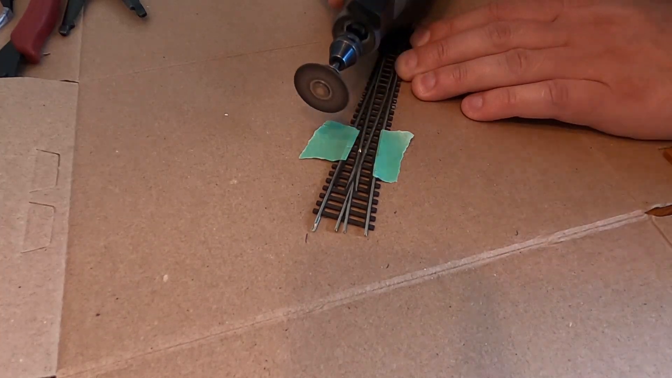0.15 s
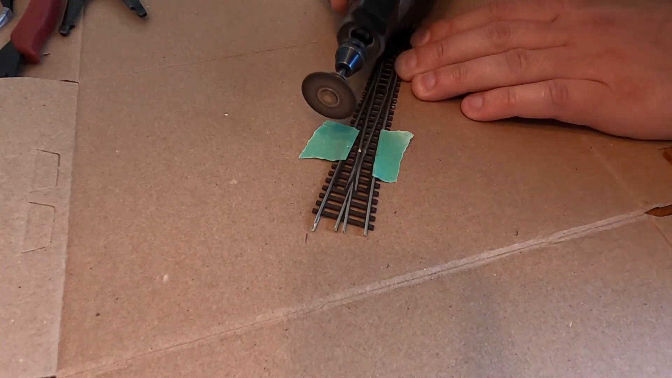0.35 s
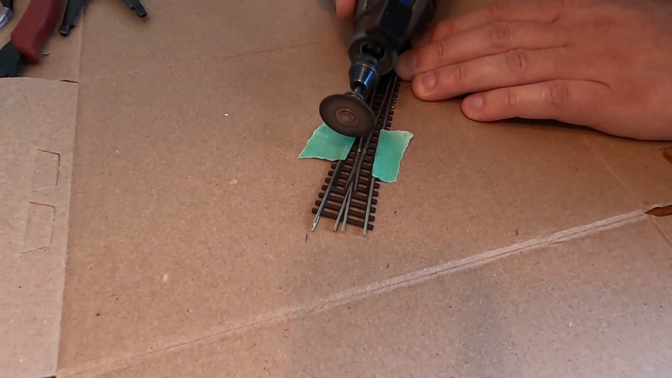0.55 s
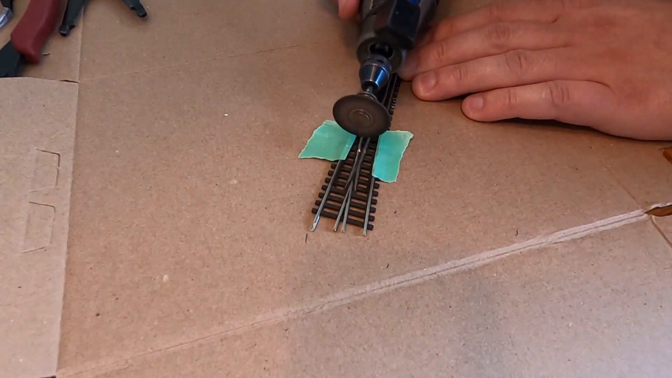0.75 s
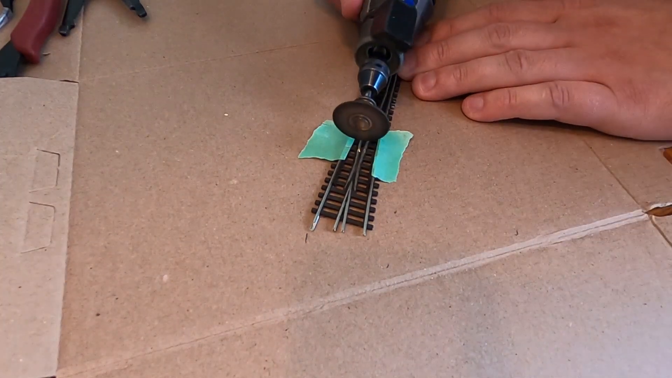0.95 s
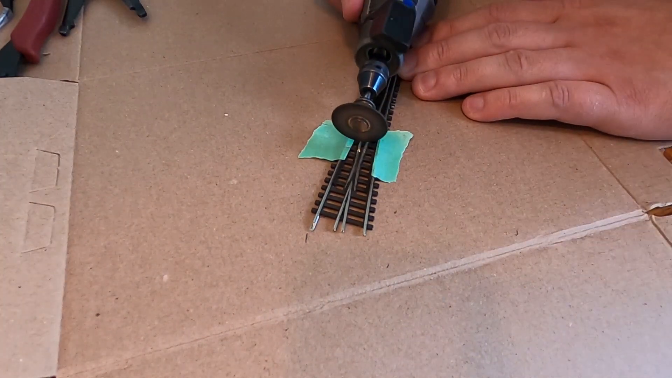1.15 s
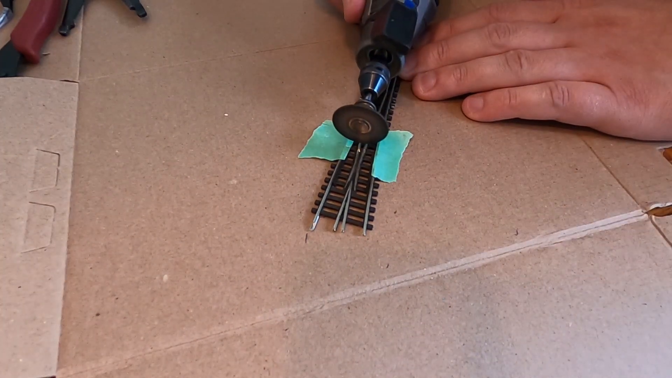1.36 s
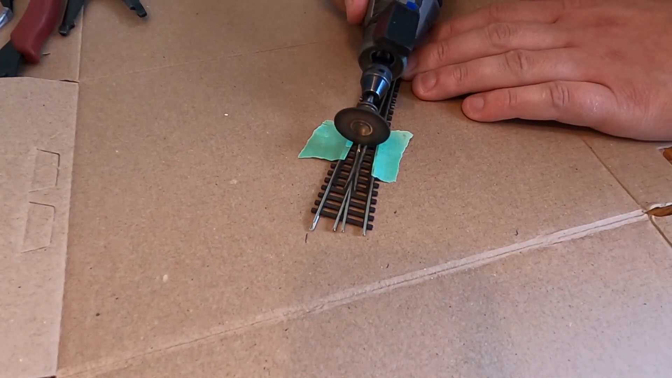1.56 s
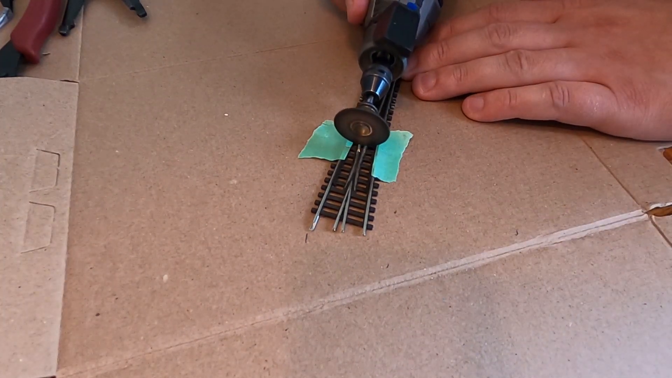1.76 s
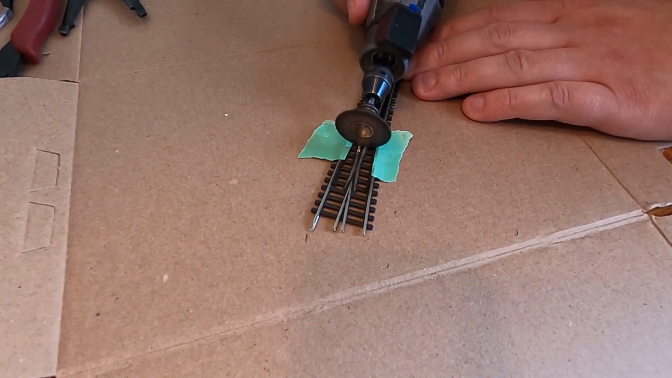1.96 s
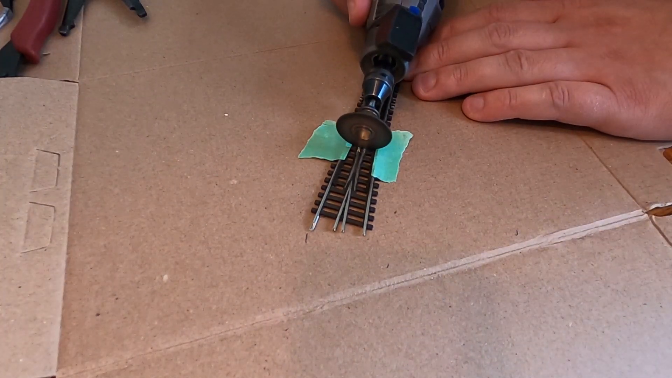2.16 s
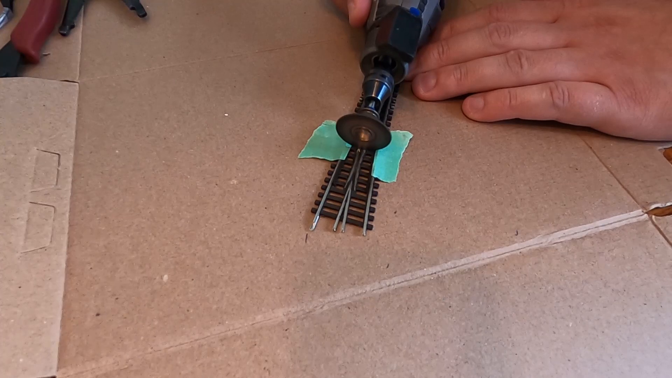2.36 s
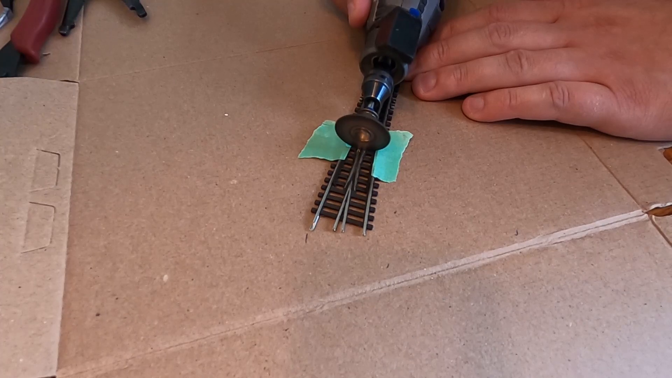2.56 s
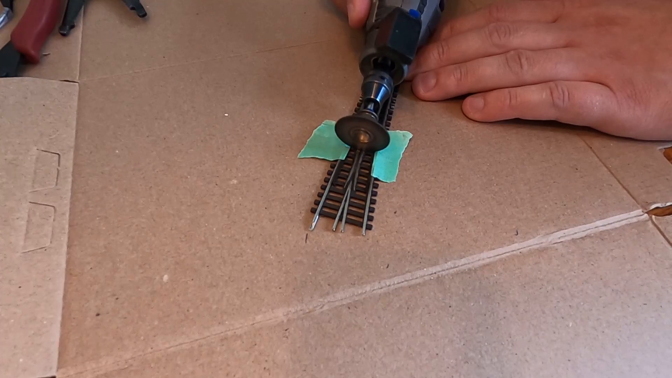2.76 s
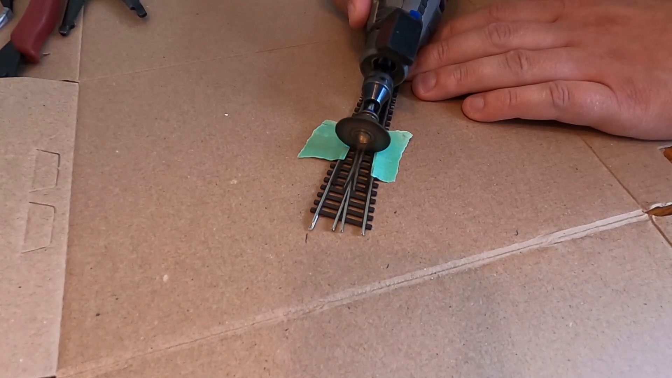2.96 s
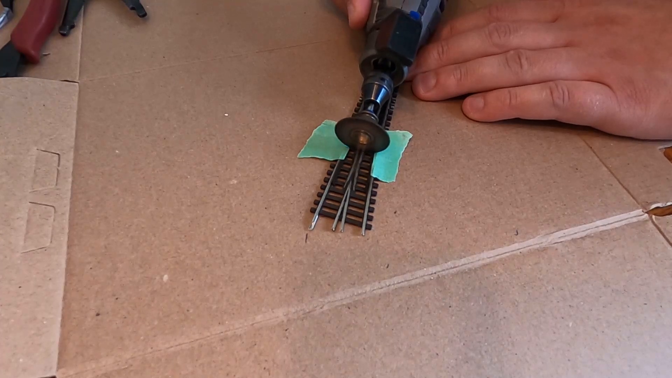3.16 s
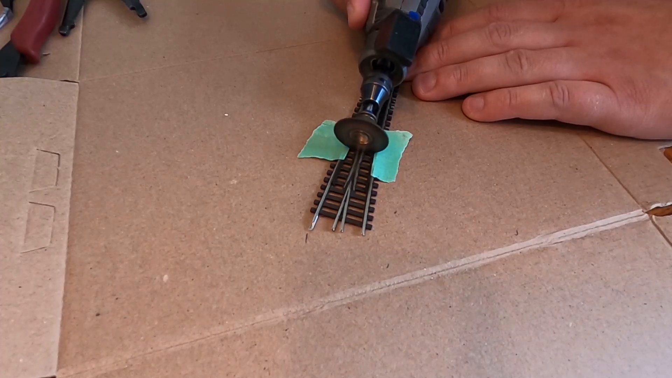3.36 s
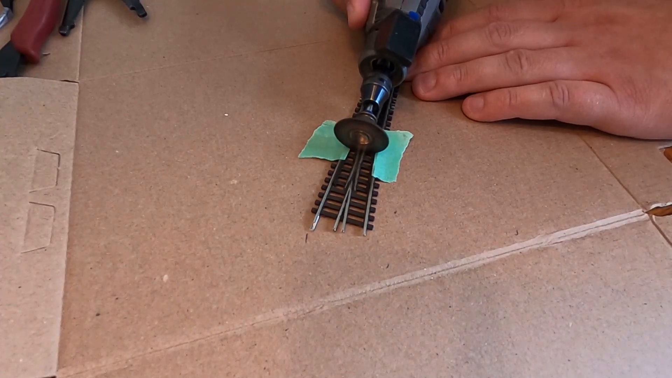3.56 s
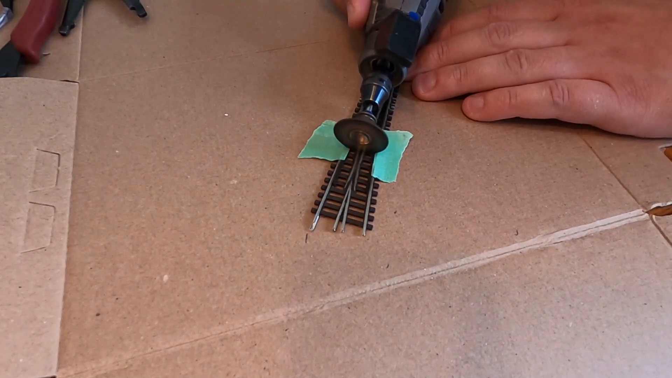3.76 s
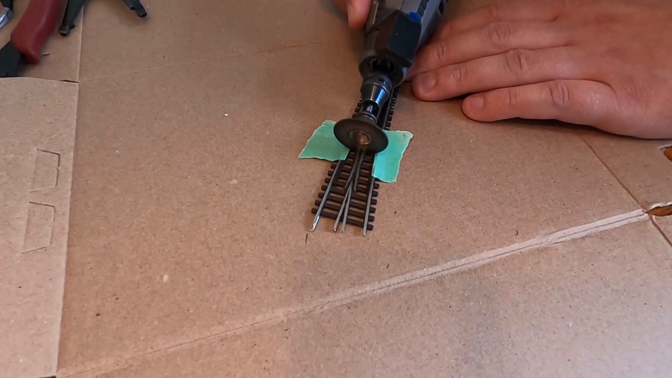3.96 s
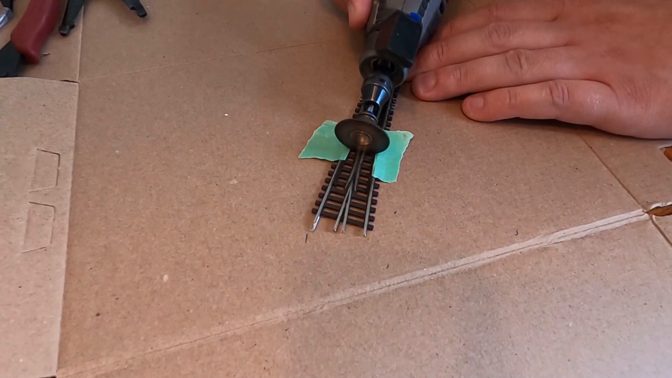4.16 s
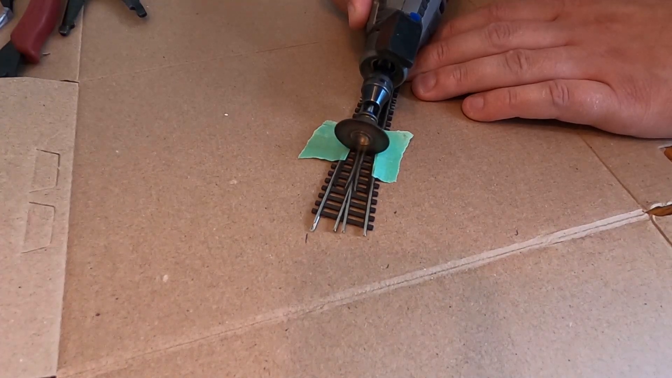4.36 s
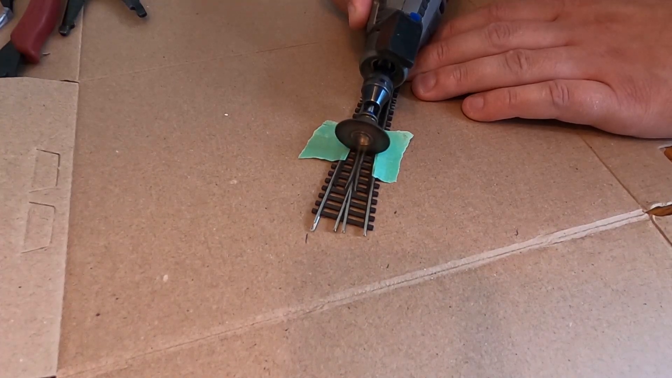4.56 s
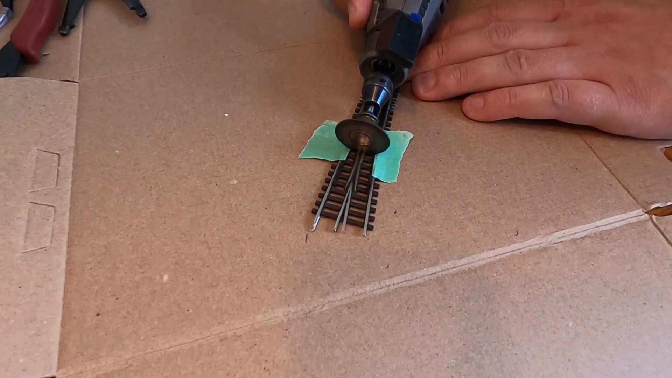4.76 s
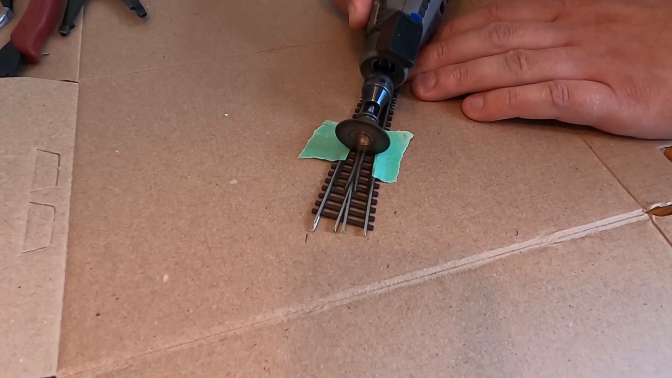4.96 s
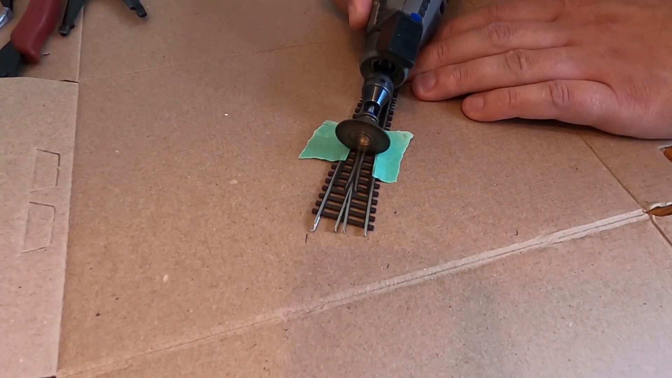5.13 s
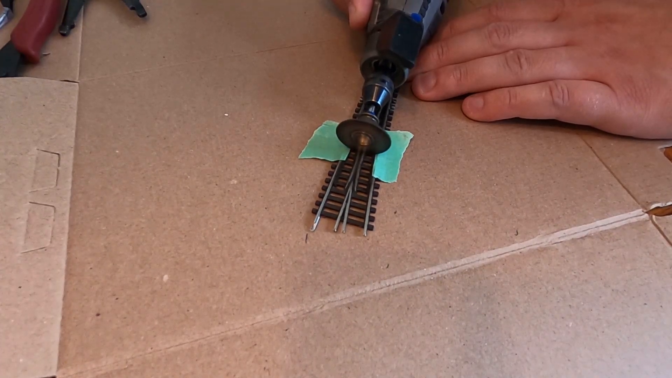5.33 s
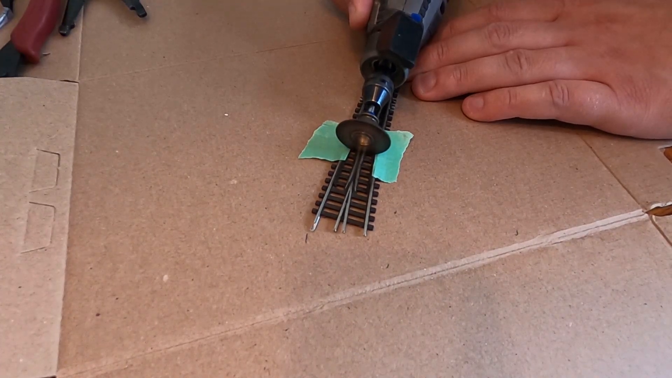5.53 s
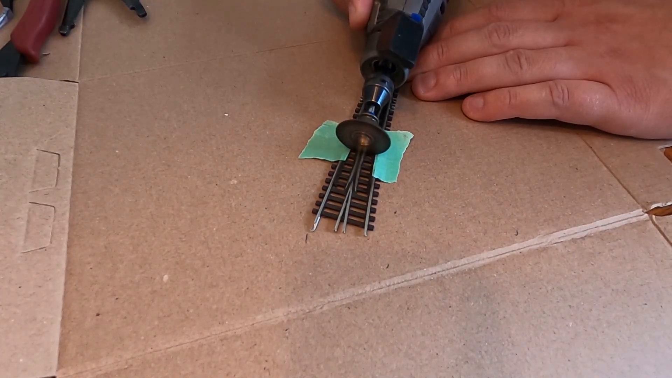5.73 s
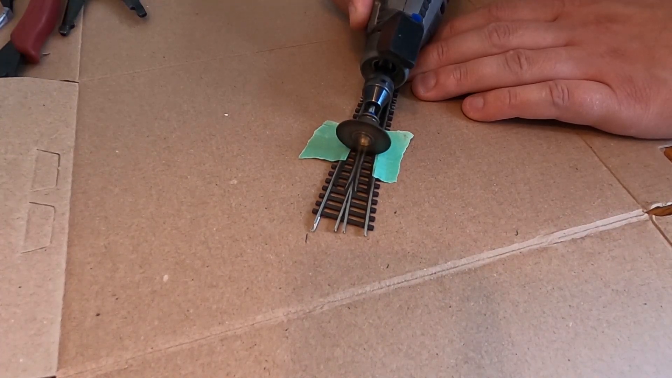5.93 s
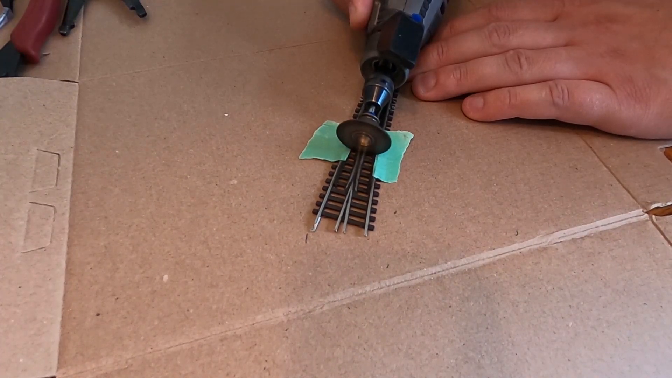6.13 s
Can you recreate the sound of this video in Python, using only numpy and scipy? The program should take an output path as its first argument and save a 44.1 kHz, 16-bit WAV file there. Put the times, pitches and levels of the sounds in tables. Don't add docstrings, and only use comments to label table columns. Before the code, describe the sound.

A handheld rotary tool whines louder as it nears, nicks a small metal rail, then grinds into it with a harsh, sagging, ringing buzz.

```python
import sys
import numpy as np
from scipy import signal
from scipy.fft import rfft, irfft, next_fast_len
from scipy.io import wavfile
from scipy.ndimage import uniform_filter1d, map_coordinates

SR = 44100
rng = np.random.default_rng(int(sys.argv[2]) if len(sys.argv) > 2 else 0)


def volts(x):
    e = np.asarray(x, float) / 20
    return 10 ** e


def wrap_up_sound(samples):
    columns = np.atleast_2d(samples).T
    tamed = np.clip(columns, -1, 1)
    steps = np.round(tamed * 32767).astype(np.int16)
    wavfile.write(sys.argv[1], SR, steps)


N = 277372
TIME = np.arange(N) / SR
MAINS_HZ = 120
MAINS_ANGLE = 2 * np.pi * MAINS_HZ * TIME


def unit(x):
    return x / np.sqrt(np.mean(x ** 2) + 1e-20)


def noise():
    return rng.standard_normal(N)


def curves(rows, off_db=None):
    s, *cols = np.transpose(rows)
    return [np.interp(TIME, s, c, off_db, off_db) for c in cols]


def bursts(rows, rise_db_per_s, fall_db_per_s):
    levels = []
    for start, hold, db in rows:
        early = np.maximum(start - TIME, 0)
        late = np.maximum(TIME - start - hold, 0)
        levels.append(db - rise_db_per_s * early - fall_db_per_s * late)
    return np.max(levels, axis=0)


def wobble(rate):
    return map_coordinates(rng.standard_normal(int(N * rate / SR) + 4), [TIME * rate], order=1)


def swell(depth_db, rate):
    knots = volts(depth_db * rng.standard_normal(int(N * rate / SR) + 2))
    return np.interp(TIME * rate, np.arange(len(knots)), knots)


def coloured(x, points, size=16384):
    f, db = np.transpose(points)
    bins = np.fft.rfftfreq(size, 1 / SR)
    gain = volts(np.interp(np.log(bins + 1), np.log(f + 1), db)) + 1e-5
    cep = irfft(np.log(gain), size)
    cep[1:size // 2] *= 2
    cep[size // 2 + 1:] = 0
    return signal.fftconvolve(x, irfft(np.exp(rfft(cep)), size))[:N]


def ringing(x, modes):
    m = next_fast_len(N + 8192)
    f = np.fft.rfftfreq(m, 1 / SR)
    gain = 0
    for k, (centre, width, db) in enumerate(modes):
        damping = 1j * f * width
        gain = gain + (-1) ** k * volts(db) * damping / (centre * centre - f * f + damping)
    return irfft(rfft(x, m) * gain, m)[:N]


# start_s, shaft_hz
FREE_SPEED = [(0.0, 159.6), (0.18, 160.3), (0.4, 163.1), (0.63, 163.7), (0.69, 162.4), (0.95, 162.3),
              (1.0, 159.9), (1.15, 160.8), (1.4, 163.2), (1.7, 163.6), (1.9, 164.7), (1.95, 162.3),
              (2.1, 160.1), (2.23, 161.8), (2.6, 159.4), (2.8, 163.1)]
# start_s, shaft_hz
LOADED_SPEED = [(2.9, 161.6), (3.08, 156.6), (3.29, 158.8), (3.611, 152.2), (3.81, 144.7), (4.05, 140.3),
                (4.26, 130.2), (4.4, 121), (4.52, 122.6), (5.001, 113.5), (5.16, 117.8), (5.381, 109.9),
                (5.491, 111.7), (5.549, 116.2), (5.61, 113.5), (5.79, 117.1), (6.039, 114), (6.29, 108.7)]


def speed():
    return curves(FREE_SPEED + LOADED_SPEED)[0]


def shaft():
    return np.cumsum(speed()) / SR


def loaded():
    return np.clip((TIME - LOADED_SPEED[0][0]) / 0.04, 0, 1)


def by_speed(rows):
    hz, *cols = np.transpose(rows)
    return [np.interp(speed(), hz, c) for c in cols]


def surface(turns, memory, fresh, count=400):
    keep = np.clip(memory, 0, .99)
    rows = signal.lfilter([1], [1, -keep], rng.standard_normal((1200, count)), axis=0)
    worn = unit(np.interp(turns * count, np.arange(rows.size), rows.ravel()))
    share = np.clip(fresh, 0, 1)
    return np.sqrt(1 - share) * worn + np.sqrt(share) * noise()


def high_spot(turns, rise, fall, rest, scatter_db):
    u = turns % 1
    size = volts(scatter_db * rng.standard_normal(1200))[turns.astype(int)]
    return rest + size * (1 - np.exp(-u / rise)) * np.exp(-u / fall)


# start_s, fan_db
MOTOR_LEVEL = [(0.0, -44.5), (0.33, -41.5), (0.55, -38), (0.85, -35), (1.14, -31), (1.3, -28.5),
               (1.62, -28), (1.67, -25.5), (1.85, -24), (2.14, -27), (2.3, -26), (2.65, -29), (2.84, -28.5),
               (2.94, -45), (3.36, -34), (3.78, -43), (4.24, -50.5), (6.29, -48.5)]


def fan_level():
    return curves(MOTOR_LEVEL)[0]


# freq_hz, level_db
FAN_SPECTRUM = [(15, -56), (25, -20), (87, -27), (112, -16.5), (192, -23.5), (240, -26.5), (273, -23.5),
                (354, -15.5), (403, -7), (468, -13.5), (912, -3), (1000, -5), (1120, 3.5), (1680, -9),
                (2100, -9.5), (2730, -52), (4620, -120)]


def fan_roar(turns):
    churn = surface(turns, memory=.5, fresh=.7) * (1 + .4 * np.cos(MAINS_ANGLE))
    return unit(coloured(churn, FAN_SPECTRUM))


# freq_hz, level_db
BRUSH_SPECTRUM = [(1060, -54.5), (1800, -34.5), (2240, -12), (2410, -12.5), (2520, 1), (2610, -5),
                  (3100, -8), (3820, -10), (5590, -15), (6580, -11), (8870, -9.5), (10800, -18.5),
                  (12900, -19.5), (15700, -27)]


def brush_chatter(turns):
    scrape = surface(turns, memory=.93, fresh=.45) * (1 + .25 * np.cos(MAINS_ANGLE))
    return unit(coloured(scrape, BRUSH_SPECTRUM))


# freq_hz, width_hz, lift_db
HOUSING_MODES = [(2363, 6, 11.5), (2446.6, 51, 11), (3340, 15, 4), (3819, 19, 11.5), (6640, 25, 7)]


def housing_gain(order, ripples):
    hz = order * speed()[::64] + ripples * MAINS_HZ
    lift_db = sum(db * np.exp(-((hz - c) / w) ** 2) for c, w, db in HOUSING_MODES)
    return np.interp(TIME, TIME[::64], volts(lift_db))


TONES_AT = [(1, 0), (1, 2), (7, 0), (8, 0), (8, -2), (8, -3), (21, 0), (23, 0), (24, 0), (26, 0), (33, 0),
            (40, 0), (41, 0), (42, 0), (48, 0), (49, 0), (50, 0), (56, 0), (64, 0), (72, 0), (80, 0),
            (88, 0), (96, 0)]
TONE_LEVELS = [-31, -22.5, -16, -15.5, -26, -16.5, -30, -14.5, -13.5, -17, -17, -19.5, -9, -42, -12, -11.5,
               -20, -10.5, -22, -19.5, -19.5, -21, -20]


def magnetic_tones(hunt):
    tones = 0
    for (order, ripples), db in zip(TONES_AT, TONE_LEVELS):
        gain = volts(db) * housing_gain(order, ripples) * swell(3, 6)
        tones = tones + gain * np.sin(order * hunt + ripples * MAINS_ANGLE + order)
    return np.sqrt(2) * (1 + .7 * np.cos(hunt)) * tones


WHISTLE_RIPPLES = [-1, 0, -2, -3, -4, 2, 3]
WHISTLE_LEVELS = [1.5, 0, -4, -32, -12, -23, -10]


def whistle(hunt, fan_db):
    order = 2 * 8
    family = 0
    for ripples, db in zip(WHISTLE_RIPPLES, WHISTLE_LEVELS):
        gain = volts(db) * housing_gain(order, ripples) * swell(depth_db=-4.5, rate=10.92)
        family = family + gain * np.sin(order * hunt + ripples * MAINS_ANGLE + ripples)
    fade_db = np.interp(TIME, [2.9, 3.0], [0, -40])
    return np.sqrt(2) * volts(fan_db - 7 + wobble(25) + fade_db) * family


def motor(turns):
    fan_db = fan_level()
    hunt = 2 * np.pi * (turns + .003 * wobble(45))
    body = volts(fan_db + 1.6 * wobble(12)) * (fan_roar(turns) + magnetic_tones(hunt))
    brush = volts(fan_db + 3 + 0.39 * wobble(12.7)) * brush_chatter(turns)
    return body + brush + whistle(hunt, fan_db)


def winding_hum():
    hum_db = -16.5 + 1.58 * fan_level() + 13.5 * loaded()
    double = volts(0.67 * wobble(19.0)) * np.sin(2 * MAINS_ANGLE)
    single = volts(0.5 + 1.4 * wobble(7.05)) * np.sin(MAINS_ANGLE)
    return np.sqrt(2) * volts(hum_db) * (double + single)


# freq_hz, width_hz, level_db
TABLE_MODES = [(179, 11, -3), (288, 10, -2)]


def table_drone():
    return volts(-63.5 + 2.5 * wobble(3.53)) * unit(ringing(noise(), TABLE_MODES))


# start_s, length_s, level_db
GRIP_SHIFTS = [(0.09, .02, -71), (0.33, .02, -71), (0.79, 0.038, -65), (1.1, 0.045, -53), (1.3, .02, -53),
               (1.66, .02, -64), (1.82, 0.098, -61), (2.24, .03, -61), (2.47, .03, -62), (2.84, .03, -68),
               (3.36, .03, -80), (3.52, 0.031, -61), (3.78, 0.026, -69), (4.84, 0.066, -76)]
# freq_hz, level_db
HAND_SPECTRUM = [(15, -28), (25, 0), (36, 4), (50, -12), (70, -62), (90, -120)]


def grip():
    shift_db = bursts(GRIP_SHIFTS, rise_db_per_s=150, fall_db_per_s=150)
    hand_db = np.maximum(shift_db, fan_level() - 60)
    return volts(hand_db) * unit(coloured(noise(), HAND_SPECTRUM))


# start_s, peak_db, ring_db
NICK_HITS = [
    (2.636, -9, -6),
    (2.6431, -4, -7),
    (2.6484, 2, -4),
    (2.662, -11, -15),
    (2.8165, -5, -3),
    (2.828, 0, -11),
    (2.8401, -4, -20),
    (2.872, -6, -7),
    (2.8905, -7, -20),
]
# freq_hz, width_hz, level_db
RAIL_MODES = [(2050, 200, -19), (2300, 100, -10), (2620, 60, 0), (2930, 100, -15)]


def nicks():
    crack, push = np.zeros(N), np.zeros(N)
    t = np.arange(200) / SR
    for start, peak_db, ring_db in NICK_HITS:
        at = round(start * SR)
        shape = volts(peak_db - 60 * t / 0.0093) * (1 - np.exp(-t / 0.00038))
        crack[at:at + len(t)] += shape * rng.standard_normal(len(t))
        push[at + 12] = volts(peak_db + ring_db + 36)
    bright = signal.lfilter([1, -.85], [1], uniform_filter1d(crack, size=2))
    return volts(0.5) * bright + ringing(push, RAIL_MODES)


# start_s, length_s, level_db
SKIM_TOUCHES = [
    (2.816, .015, -23),
    (2.868, 0.057, -19),
    (2.99, 0.071, -20),
    (3.14, 0.021, -19),
    (3.21, 0.019, -20.5),
    (3.28, 0.032, -18),
    (3.36, .025, -19.5),
    (3.49, .13, -18),
]
# freq_hz, width_hz, level_db
EDGE_MODES = [(9300, 120, 0), (11133, 910, -5), (11950, 300, 2.5), (13000, 1500, -4.5), (15240, 730, -9.5)]
# freq_hz, width_hz, level_db
FACE_MODES = [(2560, 360, -2), (4364, 160, -2), (5190, 370, -3), (6250, 410, -2.5), (7640, 920, -5)]


def skim(turns):
    touch_db = bursts(SKIM_TOUCHES, rise_db_per_s=248, fall_db_per_s=90)
    since = TIME - SKIM_TOUCHES[0][0]
    edge_db = touch_db - 12 * since - 60 * (since < -.003)
    face_db = touch_db - 12 * np.clip(1 - since / 0.046, 0, 9)
    puff = surface(turns, memory=.92, fresh=.1)
    puff = puff * high_spot(turns, rise=.2, fall=.12, rest=.01, scatter_db=1.5)
    rub = surface(turns, memory=.92, fresh=.08)
    rub = rub * high_spot(turns, rise=.25, fall=.2, rest=.03, scatter_db=1.5)
    edge = volts(edge_db) * unit(ringing(puff, EDGE_MODES))
    return edge + volts(face_db - 2.5) * unit(ringing(rub, FACE_MODES))


# shaft_hz, unbalance_db, second_order_db, third_order_db, fourth_order_db
BOARD_SHAKE = [(110.27, -58, -41.5, -50.5, -60), (113.5, -48.5, -38.5, -64, -72),
               (120, -45, -42.5, -51.5, -67), (128.1, -47, -40, -61, -51), (133.6, -44, -61, -55, -56),
               (145.1, -66, -40.5, -51, -49), (151.2, -68, -40.5, -50, -54), (151.8, -62, -61, -76, -57)]
ORDER_WANDER = [1.645, 0.66, 2.5, 4.3]


def board_shake(turns):
    angle = 2 * np.pi * turns
    orders = 0
    for k, db, wander_db in zip((1, 2, 3, 4), by_speed(BOARD_SHAKE), ORDER_WANDER):
        orders = orders + volts(db + wander_db * wobble(12)) * np.sin(k * (angle + 1))
    return np.sqrt(2) * loaded() * orders


# start_s, length_s, level_db
RAIL_SINGS = [
    (3.24, .03, -20),
    (3.5, .09, -23.5),
    (3.63, 0.34, -14.5),
    (4.03, 0.038, -19),
    (4.4, 0.21, -26),
    (5.28, 0.22, -22.5),
    (5.63, 0.042, -24),
    (5.89, 0.29, -27),
    (6.13, .16, -23.5),
]


def rail_ring(strike, scrape, grit_db):
    free_db = bursts(RAIL_SINGS, rise_db_per_s=258, fall_db_per_s=157)
    ring_db = np.maximum(free_db, grit_db - 16)
    return volts(ring_db - 5.0) * unit(ringing(strike + .5 * scrape, RAIL_MODES))


# freq_hz, level_db
GRIT_SPECTRUM = [(1000, -45), (1700, -19.5), (2250, -6), (2420, -4.5), (2710, -9), (2970, -4), (3200, -9),
                 (3750, -8.5), (4950, -9.5), (5390, -12.5), (8190, -8.5), (9860, -12.5), (12100, -13),
                 (13500, -14), (15700, -26.5)]
# freq_hz, level_db
BOARD_SPECTRUM = [(240, -95), (400, -65), (523, -5.5), (696, 9.5), (814, -0.5), (1040, 11), (1180, -30),
                  (1280, 9), (1900, -16.5), (2470, -83), (4180, -120)]


def grit(turns, strike, scrape):
    grind = surface(turns, memory=.93, fresh=.1)
    grind = grind * high_spot(turns, rise=.12, fall=.24, rest=.09, scatter_db=1.2)
    tick = np.exp(-(np.sin(np.pi * (turns - .08)) / .008) ** 2)
    kerf = unit(coloured(unit(grind) + 0.1 * unit(tick), GRIT_SPECTRUM))
    board = unit(coloured(.5 * strike + scrape, BOARD_SPECTRUM))
    return kerf + volts(-22 + 1.2 * wobble(6)) * board


CHATTER_ORDERS = [25, 33]
# shaft_hz, low_db, high_db
CHATTER_LEVEL = [(109.02, -1, 4), (114, -2.5, -10), (114.9, -2, -2), (130.6, -11, 5.5), (140.7, -34, 0),
                 (144.9, -22, -14), (158, -21, -3.5)]


def chatter(turns, grit_db):
    low_db, high_db = (grit_db + db + 1.5 * wobble(3.2) for db in by_speed(CHATTER_LEVEL))
    low_db = np.minimum(low_db, -20)
    low = np.sin(2 * np.pi * (CHATTER_ORDERS[0] * turns + .05 * wobble(25)))
    low = low * high_spot(turns, rise=.1, fall=.36, rest=0, scatter_db=1.2)
    high = np.sin(2 * np.pi * (CHATTER_ORDERS[1] * turns + .08 * wobble(25)))
    high = high * high_spot(turns - .1, rise=.3, fall=.1, rest=0, scatter_db=1.5)
    return volts(low_db + 1.5) * unit(low) + volts(high_db - 6.0) * unit(high)


# start_s, pressure_db
BITE_PRESSURE = [(3.24, -31), (3.32, -26), (3.42, -26), (3.5, -25), (3.56, -27.5), (3.75, -23.5),
                 (3.94, -23.5), (4.0, -25.5), (4.05, -24.5), (4.27, -25.5), (5.0, -25.5), (5.29, -24),
                 (5.51, -27), (5.89, -24.5), (6.29, -25.5)]


def bite(turns):
    grit_db, = curves(BITE_PRESSURE, off_db=-87)
    strike = np.exp(-(np.sin(np.pi * (turns - .06)) / .022) ** 2) * volts(.8 * wobble(40))
    scrape = surface(turns, memory=.93, fresh=.1)
    scrape = scrape * high_spot(turns, rise=.06, fall=.27, rest=.04, scatter_db=.7)
    strike, scrape = unit(strike), unit(scrape)
    ground = volts(grit_db + 2.5) * grit(turns, strike, scrape)
    return rail_ring(strike, scrape, grit_db) + ground + chatter(turns, grit_db)


def room(x):
    t = np.arange(SR // 5) / SR
    tail = rng.standard_normal(len(t)) * volts(-60 * t / 0.93)
    return signal.fftconvolve(x, tail / np.linalg.norm(tail))[:N]


# freq_hz, level_db
SIDE_SPECTRUM = [(12, -37), (20, -4), (146, -4), (461, -9), (780, -10), (844, -6), (900, -25), (1170, -55),
                 (1980, -120)]


def scene():
    turns = shaft()
    near = motor(turns) + winding_hum() + table_drone() + grip()
    near = near + nicks() + skim(turns) + board_shake(turns) + bite(turns)
    mid = near + volts(-17) * room(near)
    side = volts(-69.5 + 0.18 * wobble(5.7)) * unit(coloured(noise(), SIDE_SPECTRUM))
    return np.array([mid + side, mid - side])


def roll_off(x):
    return signal.sosfilt(signal.butter(12, 15850, fs=SR, output="sos"), x)


def record(dry):
    m = next_fast_len(N)
    spectrum = rfft(dry / (1 + np.abs(dry) ** 8) ** (1 / 8), m, axis=1)
    spectrum[:, np.fft.rfftfreq(m, 1 / SR) > 15800] = 0
    return roll_off(irfft(spectrum, m, axis=1)[:, :N])


dry = scene()
out = record(dry)
wrap_up_sound(out)
```